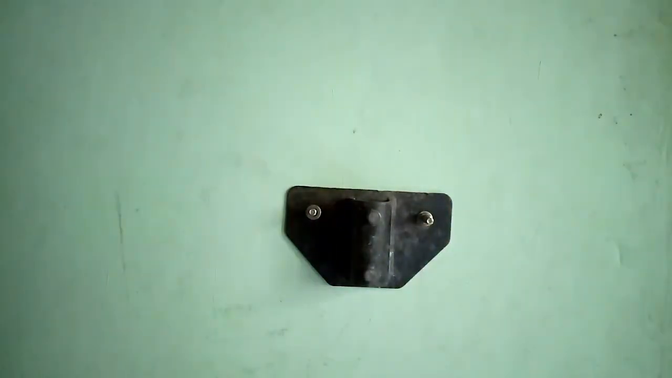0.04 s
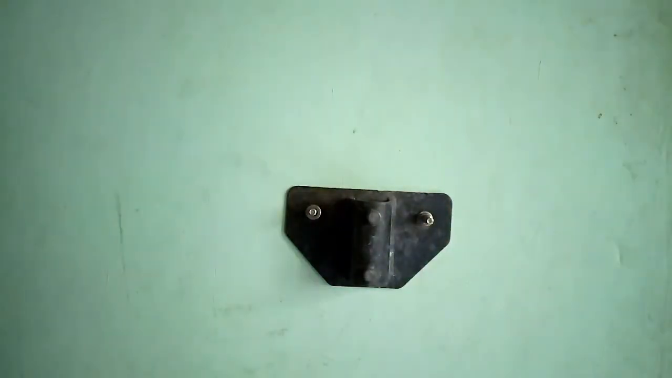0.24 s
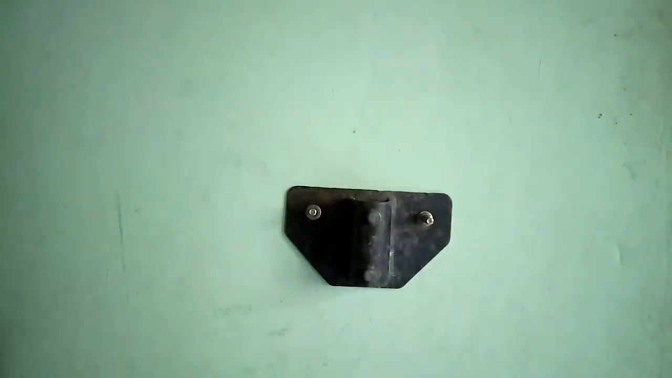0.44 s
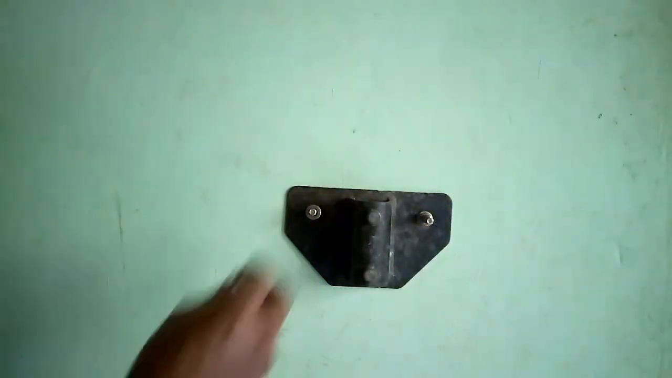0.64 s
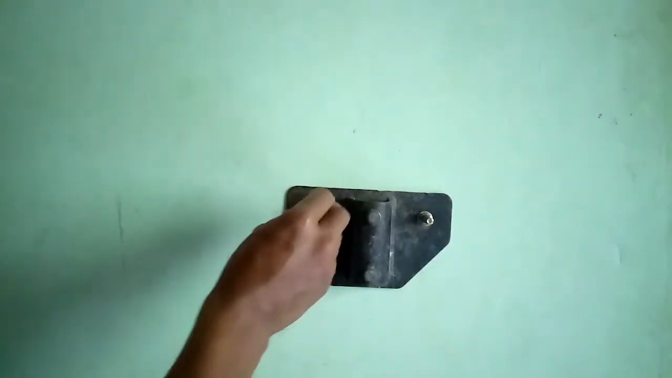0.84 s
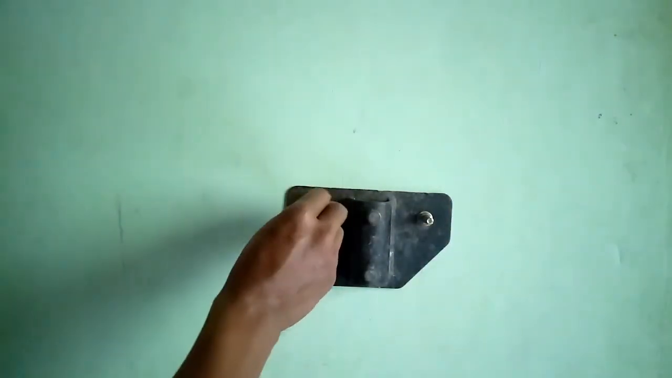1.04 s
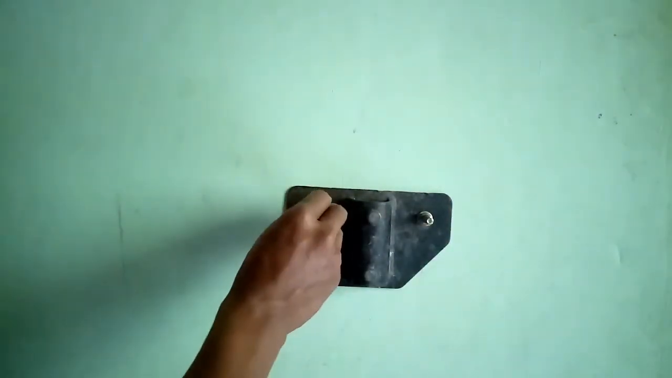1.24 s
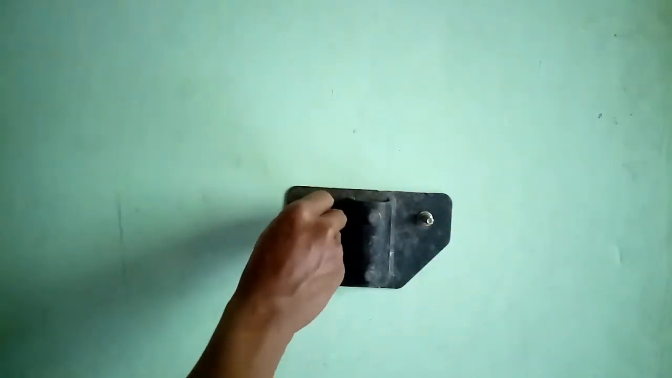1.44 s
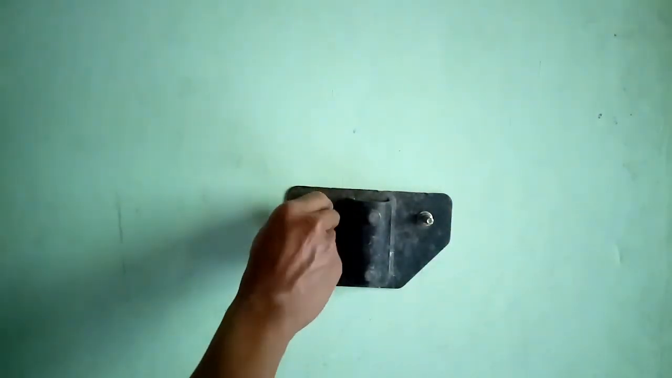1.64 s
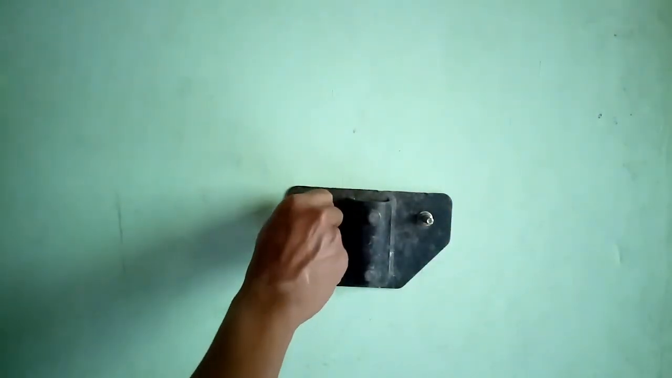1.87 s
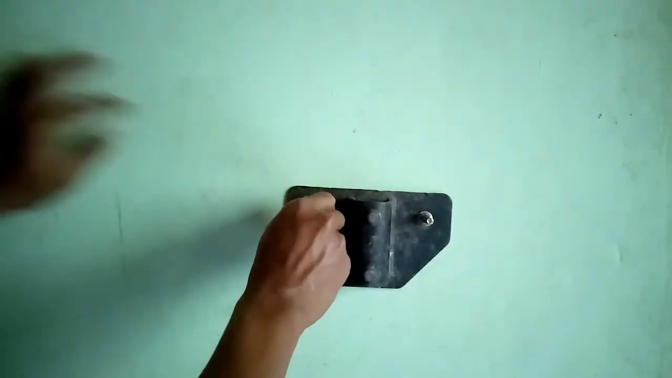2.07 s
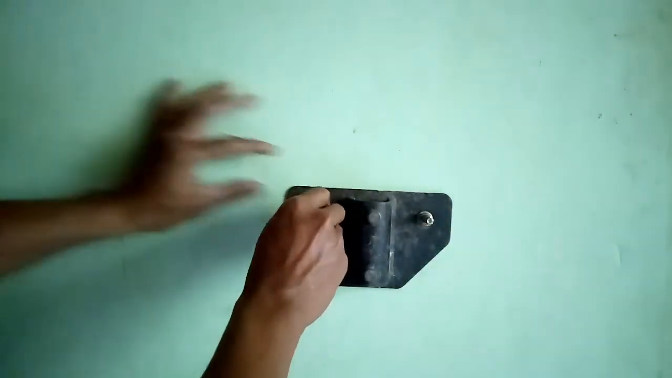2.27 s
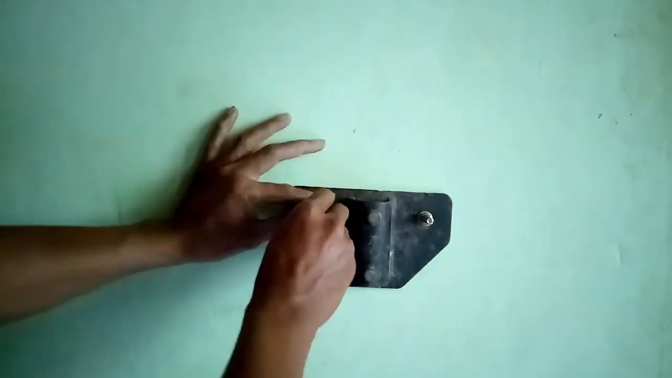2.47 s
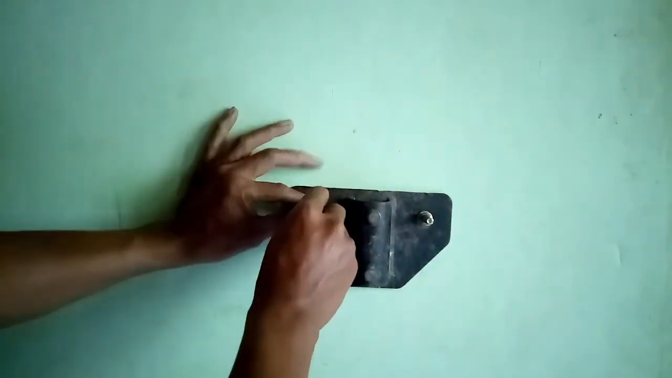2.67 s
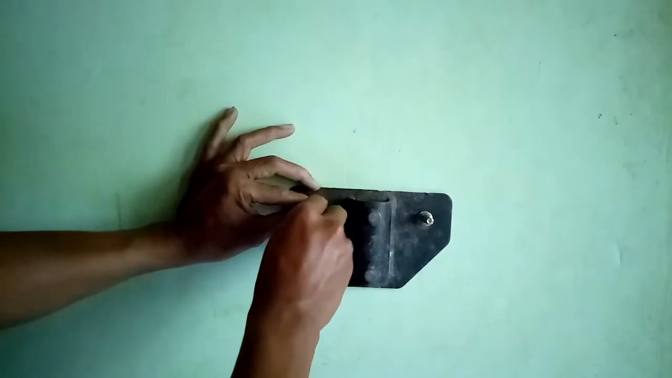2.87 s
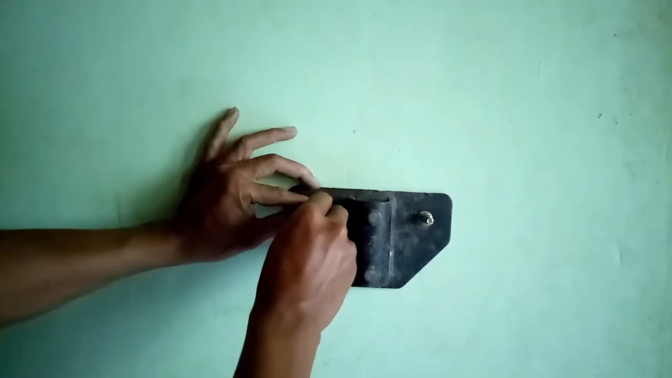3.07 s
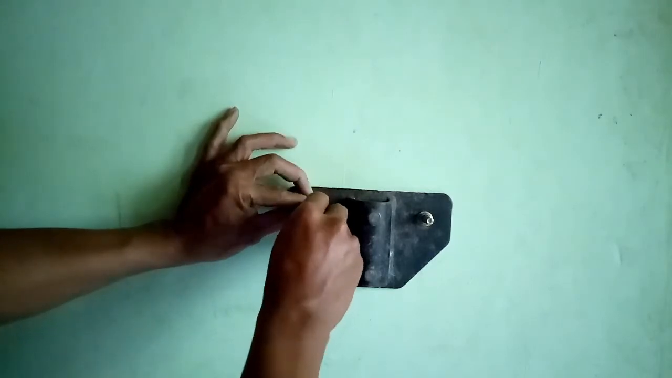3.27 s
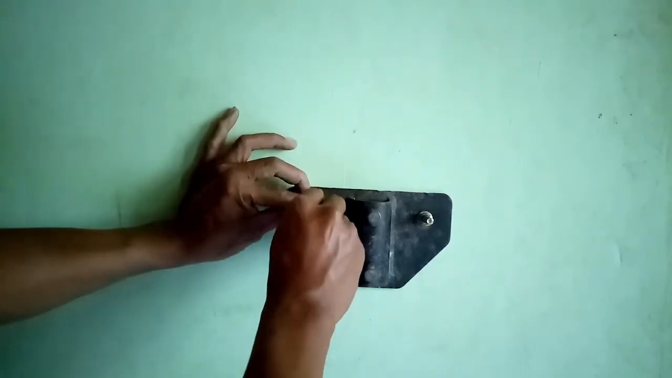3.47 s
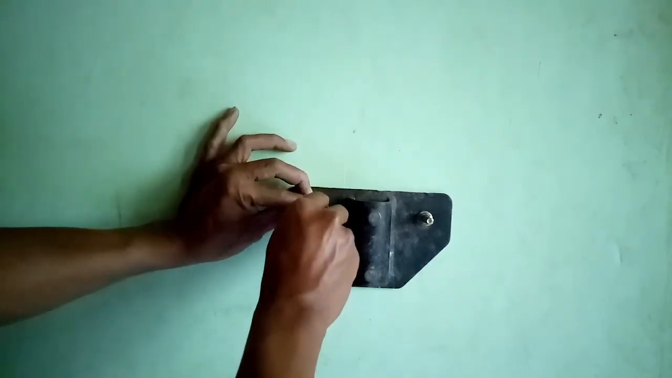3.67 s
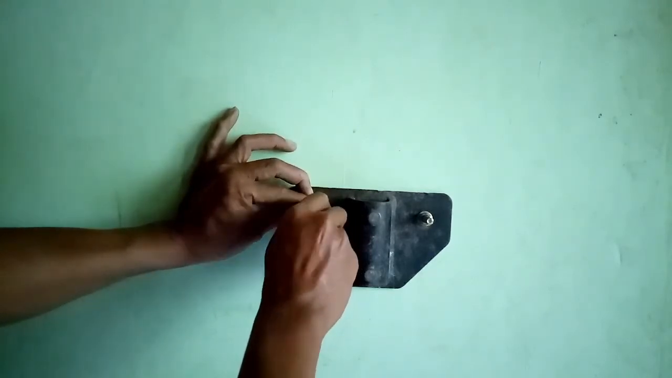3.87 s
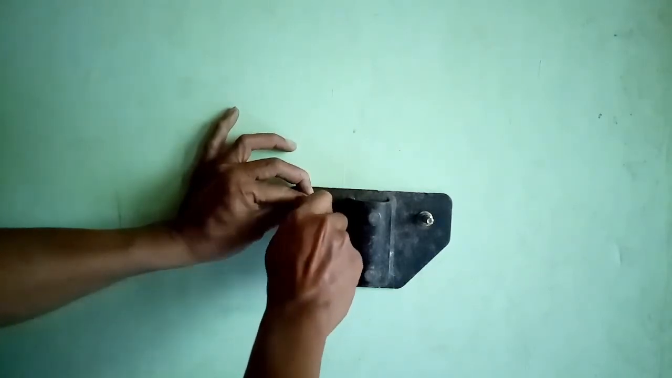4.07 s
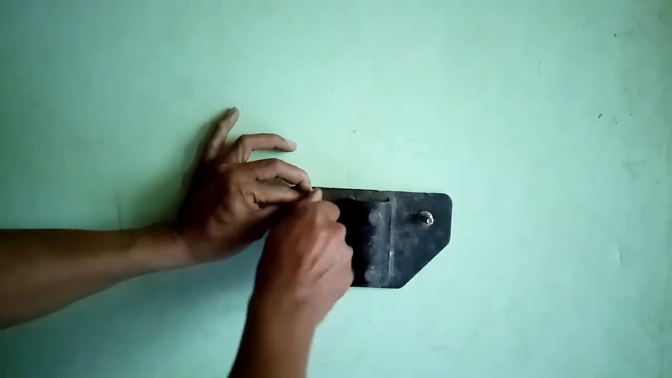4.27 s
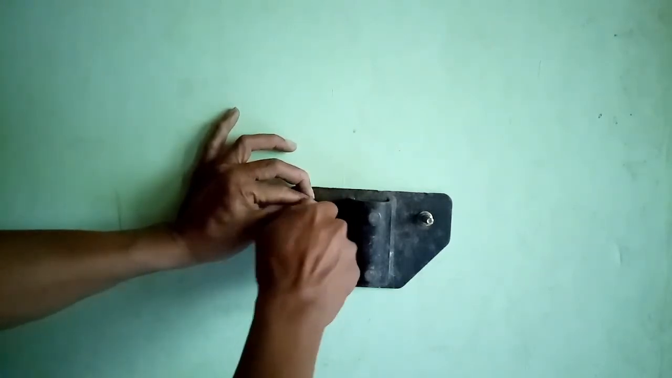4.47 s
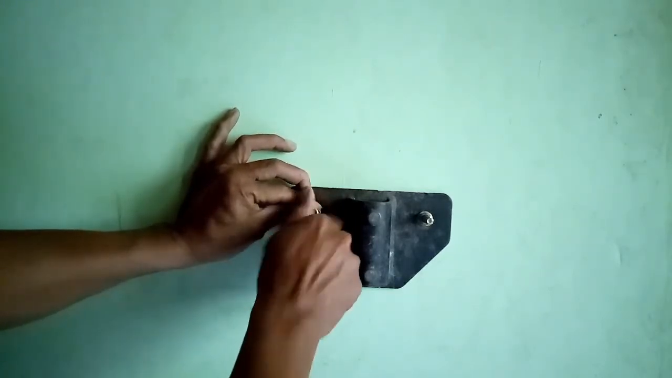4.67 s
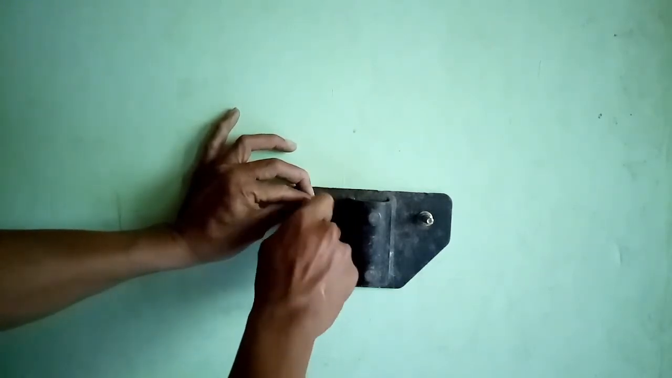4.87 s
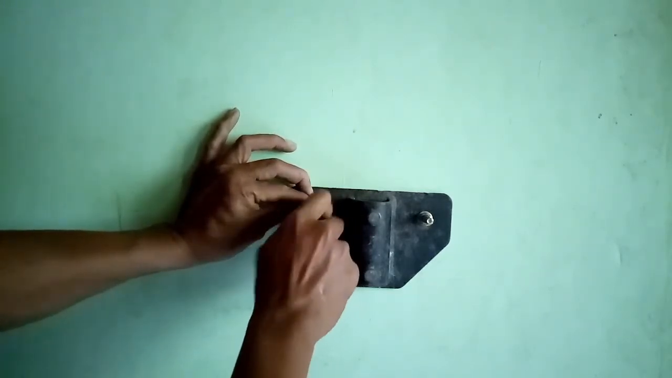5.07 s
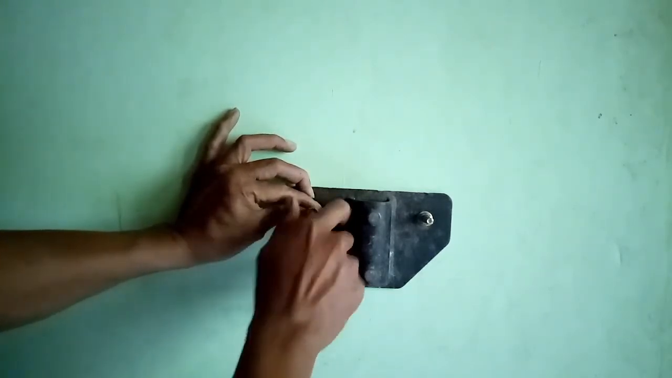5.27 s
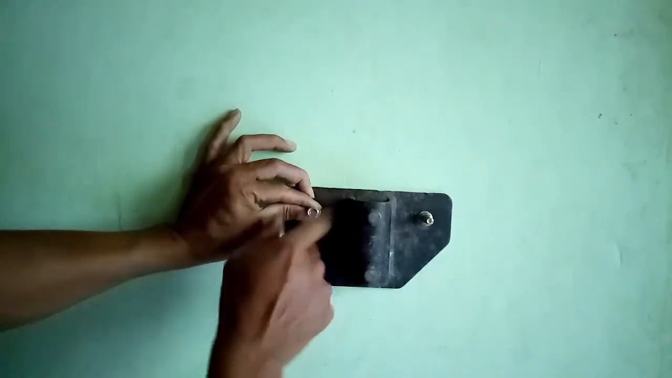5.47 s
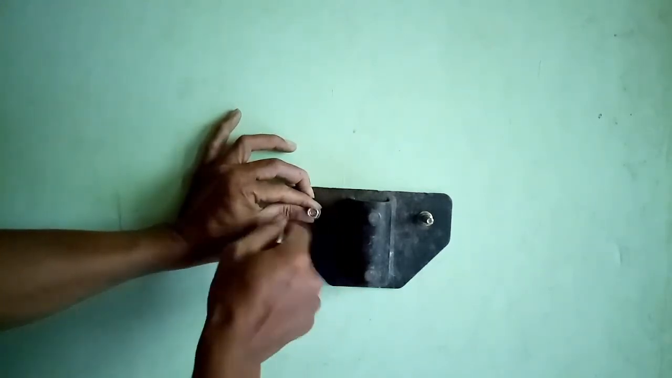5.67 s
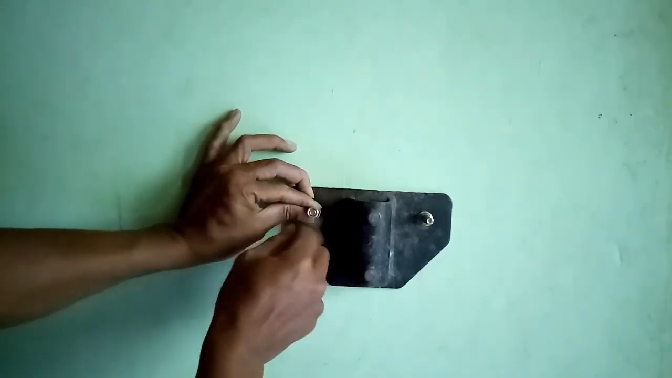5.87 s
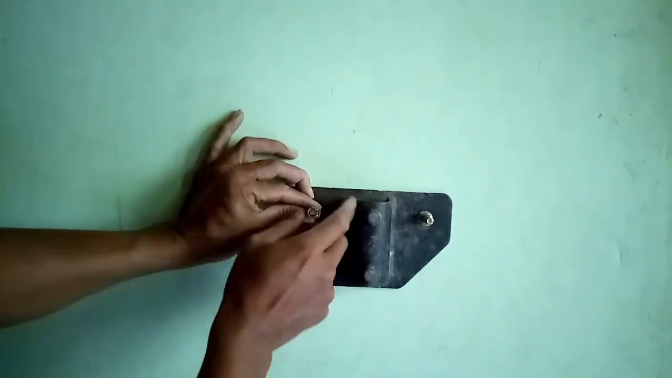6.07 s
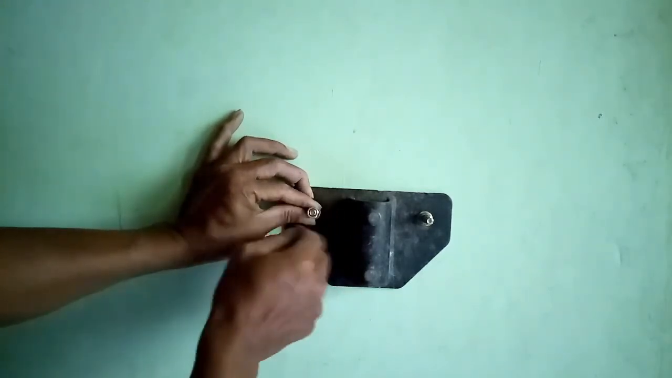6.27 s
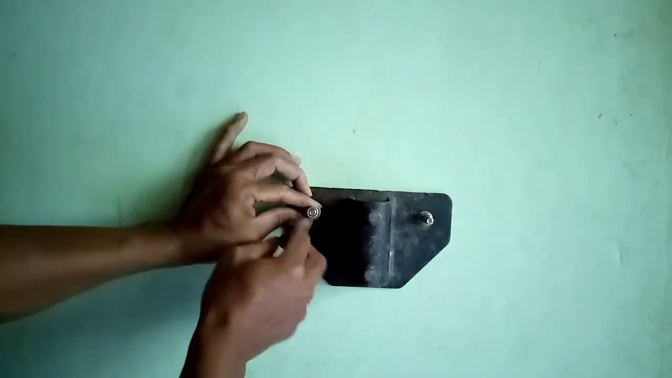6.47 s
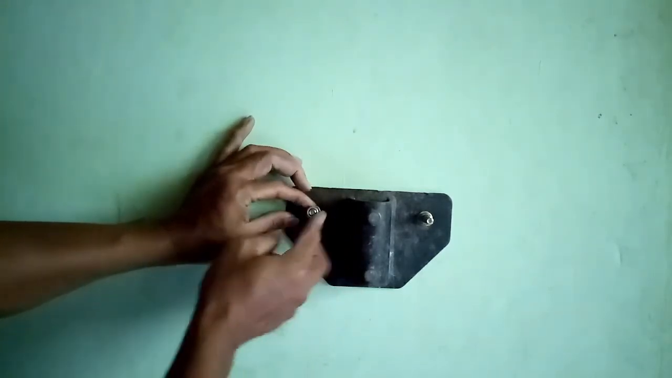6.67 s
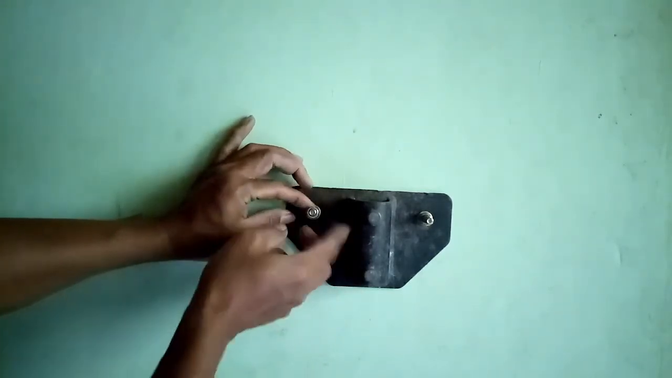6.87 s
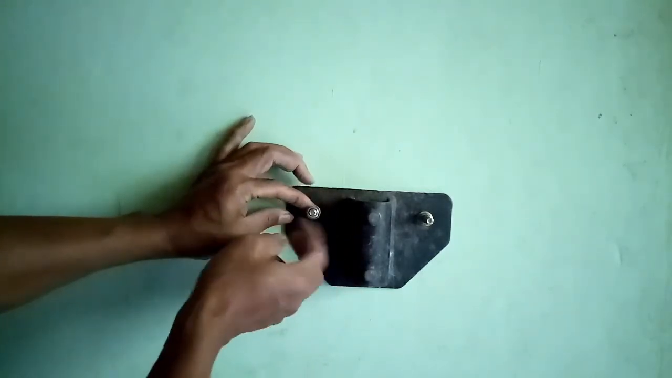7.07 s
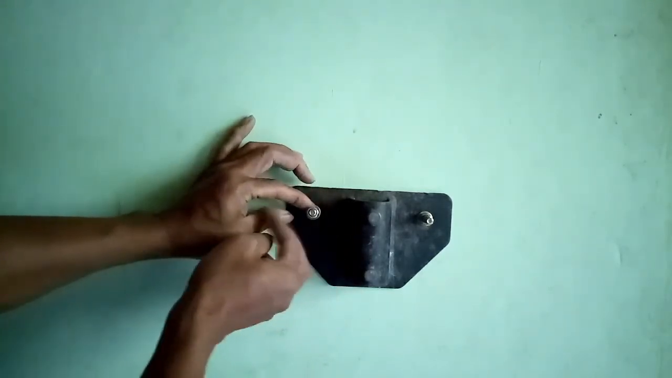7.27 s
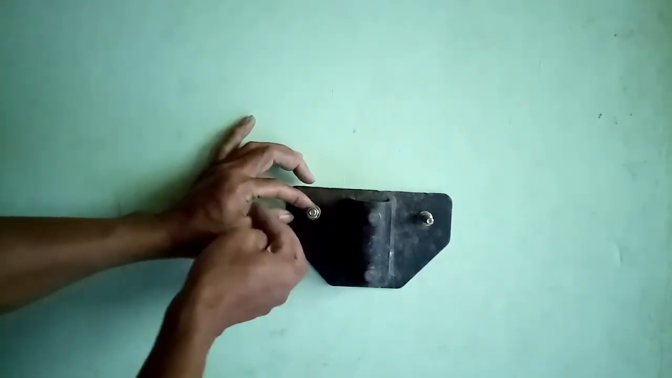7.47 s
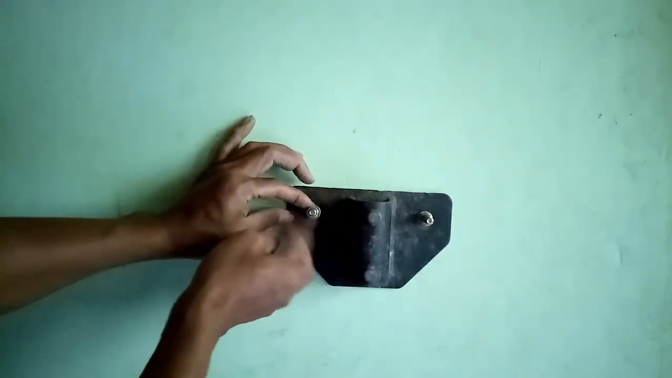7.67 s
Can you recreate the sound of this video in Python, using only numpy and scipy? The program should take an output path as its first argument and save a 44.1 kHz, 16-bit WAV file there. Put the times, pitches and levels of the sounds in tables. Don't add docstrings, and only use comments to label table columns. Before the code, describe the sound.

A very quiet bare room with low, soft hiss. Barely audible skin rubbing and a faint tick come first; at 1.1 s a small bright metal click, then tiny rattles around 1.5 s. From 2.0 to 2.3 s there are light scrapes and a faint thread squeak, and at 2.6 s a quick cluster of ticks. At 3.1 s the stuck nut gives a hard, bright crack, the loudest event, with a short room tail. A softer click at 3.4 s is followed by a faint low boom of air near 3.75 s, then sparse ticks from 4.1 to 4.8 s. From 5.05 s the nut loosens and clicks in quick succession. Strong clacks land at about 5.47, 6.0, 7.1, 7.3 and 7.5 s, with brief scraping run-ups, among lighter irregular rattles continuing to the end. Close phone-like pickup, little bass, clipped echo tails.

```python
import sys
import numpy as np
from scipy import signal
from scipy.fft import rfft, irfft
from scipy.io import wavfile
from scipy.ndimage import uniform_filter1d

SR = 44100
rng = np.random.default_rng(int(sys.argv[2]) if len(sys.argv) > 2 else 0)


def natural_amplitude(level_db):
    exponent = np.asarray(level_db, float) / 20
    return 10 ** exponent


def inscribe(sig):
    pcm = np.round(np.clip(np.atleast_2d(sig).T, -1, 1) * 32767)
    wavfile.write(sys.argv[1], SR, pcm.astype(np.int16))


N = 340893
GATE_DB = 3.5


def evened(x):
    return x / np.sqrt(np.mean(x ** 2) + 1e-20)


def read(points, hz):
    f, value = np.transpose(points)
    return np.interp(np.log(hz + 1), np.log(f + 1), value)


def add(mix, s, sound):
    part = mix[round(s * SR):][:len(sound)]
    part += sound[:len(part)]


def coloured(x, db):
    log = np.log(natural_amplitude(np.maximum(db, db.max() - 95.0)))
    mirrored = np.r_[log, log[-2:0:-1]]
    phase = -signal.hilbert(mirrored).imag[:len(log)]
    response = irfft(np.exp(log + 1j * phase))
    return signal.oaconvolve(x, response)[:len(x)]


def resonate(x, hz, width):
    turn = np.exp(2j * np.pi * np.cumsum(hz * np.ones(len(x))) / SR)
    r = np.exp(-np.pi * width / SR)
    return 2 * (turn * signal.lfilter([1 - r], [1, -r], x / turn)).real


def fuzzy(width):
    return lambda hz: resonate(resonate(rng.standard_normal(len(hz)), hz, width), hz, width)


def stroke(rows, source):
    s, level_db, hz = np.transpose(rows)
    t = np.arange(s[0], s[-1], 1 / SR)
    sound = evened(source(np.interp(t, s, hz)))
    return s[0], natural_amplitude(np.interp(t, s, level_db)) * sound * signal.windows.tukey(len(t), .1)


def swells(rows, source, ends_db, curve):
    mix, u = np.zeros(N), np.linspace(-1, 1, num=21)
    for s, db, hz, rise_s, fall_s in rows:
        times = s + u * np.where(u < 0, rise_s, fall_s)
        levels = db + ends_db * abs(u) ** curve
        add(mix, *stroke(np.transpose([times, levels, hz + 0 * u]), source))
    return mix


def impact_train(own, t, strength):
    impacts = own.standard_normal(len(t)) * (own.random(len(t)) < .15) * strength
    impacts[1500] += .7
    snap = own.standard_normal(len(t)) * natural_amplitude(-60 * np.arange(len(t)) / SR / .007)
    z = rfft(impacts) * rfft(snap)
    z = z / np.sqrt(abs(uniform_filter1d(abs(z) ** 2, size=35)) + 1e-9)
    z = z / abs(z) ** 0.4
    return irfft(z) * uniform_filter1d(strength + .002, size=60) ** 0.22


# frequency in Hz, bandwidth in Hz, level in dB.
FIRST = [(3500, 43, 0), (3740, 120, -8), (4270, 56, -16), (4840, 33, -12), (5250, 34, -5), (5430, 20, -19),
         (6320, 34, -29), (6810, 58, -19), (7390, 76, -40), (8670, 57, -29), (10700, 39, -36)]
# frequency in Hz, bandwidth in Hz, level in dB.
BINDING = [(3510, 47, -10), (4170, 36, -1), (4340, 44, 0), (4950, 26, -7), (5100, 35, -3), (6080, 60, -6),
           (6390, 100, -7), (6790, 46, -7), (10200, 38, -11), (11100, 44, -20), (11400, 53, -21),
           (11700, 53, -20)]
# frequency in Hz, bandwidth in Hz, level in dB.
PLATE = [(2120, 38, -11), (2400, 57, -12), (4510, 79, 0), (4760, 89, 0), (5220, 59, -5), (5910, 48, -3),
         (6390, 56, -2), (6820, 97, -2), (7900, 44, -17), (8120, 31, -16), (8590, 33, -8), (9440, 31, -10),
         (9790, 47, -21), (11100, 39, -3)]
# frequency in Hz, bandwidth in Hz, level in dB.
CRACKED = [(2130, 28, -14), (3010, 26, -14), (4540, 30, -1), (5230, 42, 0), (6010, 72, -6), (6400, 39, -5),
           (6720, 170, -6), (7930, 61, -13), (8580, 64, -12), (9460, 42, -8), (9800, 27, -5),
           (10100, 34, -10), (11100, 29, -10), (11900, 36, -20)]
# frequency in Hz, bandwidth in Hz, level in dB.
PRESSED = [(2770, 37, -2), (3480, 38, 0), (3720, 55, 0), (3910, 56, -2), (4840, 130, -8), (5370, 33, -6),
           (5560, 52, -8), (5790, 34, -4), (7930, 38, -9), (8600, 31, -7), (9460, 48, -11), (9790, 26, -8),
           (11200, 80, -20), (12400, 36, -21)]
# frequency in Hz, bandwidth in Hz, level in dB.
EASED = [(2650, 49, -7), (3340, 37, -12), (4150, 110, -5), (4710, 150, -2), (5210, 54, -4), (6080, 76, 0),
         (6400, 51, -2), (6830, 61, -2), (7030, 91, -7), (9470, 42, -17), (9800, 42, -3), (10100, 27, -11),
         (11000, 35, -11), (11100, 33, -9)]
# frequency in Hz, bandwidth in Hz, level in dB.
SLACK = [(1640, 82, -13), (2490, 52, -6), (2650, 37, -5), (3120, 69, -4), (3470, 46, -8), (4150, 63, 0),
         (4770, 150, -10), (5230, 190, -8), (5840, 36, -11), (6060, 100, -10), (6380, 57, -12),
         (6800, 84, -10), (9800, 33, -18), (11100, 31, -24)]
# frequency in Hz, bandwidth in Hz, level in dB.
LOOSE = [(1690, 38, -11), (2130, 37, -5), (3110, 42, 0), (3290, 43, -6), (3490, 46, -6), (4140, 49, -1),
         (4570, 74, -4), (5160, 84, -2), (5410, 43, -7), (6060, 75, -6), (6840, 60, -4), (8620, 42, -20),
         (9790, 53, -16), (11100, 58, -12)]
# frequency in Hz, bandwidth in Hz, level in dB.
HELD = [(2130, 32, -7), (3320, 48, -2), (3490, 110, 0), (3860, 29, -3), (4130, 63, -3), (4540, 38, -3),
        (5170, 30, -5), (6100, 61, -4), (6740, 73, -10), (7930, 46, -23), (8590, 35, -19), (9460, 31, -17),
        (9790, 31, -14), (11300, 24, -19)]
# frequency in Hz, bandwidth in Hz, level in dB.
FLYING = [(2150, 34, -10), (2360, 30, -8), (2640, 40, -2), (2990, 32, -6), (3490, 210, -5), (3880, 170, -7),
          (4310, 47, -7), (4640, 160, -4), (5210, 180, -7), (5530, 54, -8), (5780, 30, -3), (6080, 56, 0),
          (6820, 150, -8), (11400, 140, -10)]
# frequency in Hz, level in dB per Hz.
FIRST_GRIP = [(2890, -29.5), (3060, -8), (3610, 3.5), (4390, -23), (5200, -21), (7020, -26), (7820, -45),
              (9140, -37)]
# frequency in Hz, level in dB per Hz.
STUCK = [(1500, -32.5), (2570, -30.5), (4020, -2.5), (4660, 2.5), (5500, -11.5), (6620, 4), (7750, -22),
         (11400, -4.5)]
# frequency in Hz, level in dB per Hz.
BREAKS_FREE = [(1880, -29.5), (2800, -23.5), (3010, 1), (3320, -14), (4670, 3.5), (6940, 2.5), (7480, -14),
               (10100, -8)]
# frequency in Hz, level in dB per Hz.
REGRIP = [(1500, -38), (2200, -27), (2550, 2), (3500, 0.5), (6800, -8.5), (7400, -32), (10000, -23.5),
          (12400, -6)]
# frequency in Hz, level in dB per Hz.
CREEPS = [(1500, -30), (2370, -26), (2620, -0.5), (6250, -6.5), (8050, 7.5), (8970, -27.5), (10100, 0),
          (12000, -7)]
# frequency in Hz, level in dB per Hz.
SLACKENS = [(1450, -30), (1700, -20), (2200, -12.5), (3000, 0), (6900, 1.5), (7500, -38), (10000, -33),
            (12000, -38)]
# frequency in Hz, level in dB per Hz.
LIFTS_OFF = [(1450, -18.5), (1700, -9), (2200, -2.5), (3000, 5.5), (6900, 4), (7500, -21), (10000, -27),
             (12000, -27)]
# frequency in Hz, level in dB per Hz.
SPINS = [(1140, -25.5), (1670, -22), (1860, -15), (2150, -4), (4080, 1.5), (6700, 0), (8050, -22),
         (11400, -11)]
# frequency in Hz, level in dB per Hz.
STEADIED = [(1880, -28.5), (2070, -9), (2480, -16), (3610, -1), (6040, 5), (8980, -32), (9470, -19.5),
            (11700, -14)]
# frequency in Hz, level in dB per Hz.
FLICKED = [(1200, -21.5), (1710, -8.5), (2570, 2), (3420, 5), (5500, -2.5), (5980, 3.5), (9290, -17.5),
           (11600, 2.5)]
# start in seconds, modes, crack spectrum, ring level in dB, longest t60 in seconds.
GRIPS = [(0, FIRST, FIRST_GRIP, -23, 0.06), (1.4, BINDING, STUCK, -15, 0.078),
         (1.9, PLATE, STUCK, -15.5, 0.034), (3.0, CRACKED, BREAKS_FREE, -18, 0.14),
         (3.3, PRESSED, REGRIP, -17.5, 0.054), (4.0, EASED, CREEPS, -10, 0.034),
         (4.6, SLACK, SLACKENS, -10, 0.07), (5.0, SLACK, LIFTS_OFF, -6.5, 0.06),
         (5.43, LOOSE, SPINS, -22, 0.045), (6.45, HELD, STEADIED, -20.5, 0.047),
         (6.7, FLYING, FLICKED, -25.5, 0.047)]
# frequency in Hz, level in dB.
CRACK_ENDS = [(600, -24.5), (1300, -6.5), (12000, 1.5), (15500, -39)]


def knock(row, chatter_s, lead_s, seed):
    s, peak_db, ring_hz, weight_db, high_db = row
    _, modes, crack, ring_db, longest_s = [grip for grip in GRIPS if grip[0] <= s][-1]
    own = np.random.default_rng(seed)
    t = np.arange(-1500, 1500) / SR
    strength = np.where(t < 0, np.exp(t / lead_s), np.exp(-t / chatter_s))
    strength += natural_amplitude(-30) * (t > -.007) * (t < 0)
    drive = impact_train(own, t, strength)

    age = np.arange(8000) / SR
    body = 7.9 * (age == 0)
    touch_db = 1.8 * own.standard_normal(30)
    splits = own.uniform(-.02, .02, 30)
    for (f, width, db), luck_db, split in zip(modes, touch_db, splits):
        level_db = db - read(crack, f) + luck_db + ring_db
        t60_s = np.clip(3.0 / width, .015, longest_s)
        pair = np.sin(2 * np.pi * f * age) + 0.45 * np.sin(2 * np.pi * f * (1 + split) * age)
        body += natural_amplitude(level_db - 60 * age / t60_s) * pair
    body += natural_amplitude(-27.0 - 60 * age / 0.078) * np.sin(2 * np.pi * ring_hz * age)

    hz = np.fft.rfftfreq(1024, 1 / SR)
    low_slope_db = -2
    tilt = [(2300, weight_db - low_slope_db), (3200, weight_db + low_slope_db),
            (4500, 0), (6900, 0), (7800, high_db)]
    colour_db = read(crack, hz) + read(CRACK_ENDS, hz) + read(tilt, hz)
    colour_db -= 6.0 * np.minimum(abs(np.log2((hz + 1) / ring_hz)), .8)
    colour_db += 1.0 * evened(uniform_filter1d(own.standard_normal(len(hz)), size=9))
    sound = coloured(signal.fftconvolve(drive, body), colour_db)
    return s + t[0], natural_amplitude(peak_db) * sound / abs(sound).max()


# start in seconds, peak in dB, strongest ring in Hz, brightness above
# 8 kHz in dB, run-up in seconds.
SLAMS = [
    (5.4429, -31.5, 4060, 0.5, 0.0025),
    (5.4735, -19.5, 3330, 1, 0.017),
    (5.99, -19, 3010, 3, 0.025),
    (6.273, -29, 3330, -1, 0.0035),
    (6.747, -42, 6250, 1.5, 0),
    (6.8068, -26, 3720, -4, 0.026),
    (7.085, -19.5, 6430, -5.5, .018),
    (7.2917, -20, 5930, -7, 0.015),
    (7.5254, -19.5, 5880, -6.5, 0.028),
]


def slam_rows():
    weight_db, run_up_db, dull_db = 2, -11.5, -7
    slams, run_ups = [], []
    for s, db, hz, high_db, lead_s in SLAMS:
        slams.append((s, db, hz, weight_db, high_db))
        if lead_s > .004:
            run_ups.append((s - lead_s, db + run_up_db, hz, weight_db, high_db + dull_db))
    return slams, run_ups


# start in seconds, peak in dB, strongest ring in Hz, weight under
# 3 kHz in dB, brightness above 8 kHz in dB.
TICKS = [(0.3864, -68, 6000, 6, -18), (1.113, -61, 3740, -8, -5), (1.4335, -59, 6860, -5, -1),
         (3.374, -48, 3450, -7, -10), (1.1245, -27.5, 3690, -11.5, -1), (1.1384, -55, 3500, 14, -5),
         (1.1671, -52, 3750, -5, 8), (1.2074, -41.5, 3500, 10, 6), (1.2198, -45.5, 4000, -20, -12),
         (2.0338, -44, 4500, 7, -3.5), (2.2271, -48, 6800, -7.5, 6), (2.596, -38.5, 4920, -5, -5.5),
         (2.6031, -36.5, 6050, 6, 4), (2.6165, -35, 4850, -9, -1), (2.7314, -50, 4500, 13, -9),
         (2.9298, -54, 6170, -11, 0), (3.08, -33.5, 4730, -3, -6), (3.0896, -23.5, 7150, 2, -3),
         (3.0946, -14.5, 5120, 0, 2), (3.3831, -27, 3540, -5, 1.5), (4.1351, -51, 3480, 16.5, 11),
         (4.3077, -32, 4640, -6, 0.5), (4.5287, -35.5, 6300, -7.5, -12.5), (4.6414, -48.5, 4020, -11.5, -6),
         (4.7201, -45.5, 3930, -5, -7), (4.7464, -48, 3930, -13.5, -5)]
# start in seconds, peak in dB, strongest ring in Hz, weight under
# 3 kHz in dB, brightness above 8 kHz in dB.
FREE_TICKS = [(5.0545, -35, 4170, -5.5, -1.5), (5.0957, -32.5, 4260, 5, 4), (5.1502, -31, 4660, 3, 2),
              (5.2816, -42.5, 4340, -11.5, -19), (5.414, -40.5, 4240, -13, -3),
              (5.5691, -24, 3160, -2, 2.5), (5.6748, -24.5, 2770, 2, 4), (5.7389, -36.5, 4100, -7, -4),
              (5.9237, -41.5, 3230, 1, -21), (6.17, -46.5, 5900, -22, -7),
              (6.2275, -28.5, 3870, -3.5, -0.5), (6.2325, -44, 6200, -8, -5), (6.5002, -24, 4110, 6, 5.5),
              (6.5145, -35.5, 3380, 23, -5), (6.298, -48, 3140, 5, -8), (6.7437, -33.5, 5560, -18, -17),
              (6.9939, -51, 4640, -18, -6), (7.012, -28, 5500, -6, -8), (7.2514, -31, 6400, 3, -7),
              (7.4059, -24, 3980, -2, -4), (7.4851, -26.5, 2580, -10, -9), (7.7214, -25.5, 3480, -8, -3)]
# start in seconds, peak in dB, strongest ring in Hz, weight under
# 3 kHz in dB, brightness above 8 kHz in dB.
RATTLES = [(0.842, -65.5, 6060, -2, -12), (1.4446, -44.5, 6800, -9, 0.5), (1.4567, -47, 4180, -11, -26),
           (1.4763, -43, 4060, 9, -7), (1.514, -44, 6250, 0.5, -5), (1.9783, -57, 5300, -29, -13),
           (2.4254, -68, 5800, -1, 10), (5.068, -43, 3110, 4.5, -18), (5.11, -41, 3120, 4, -7),
           (4.32, -48, 5200, -6, 2), (5.168, -35.5, 2670, 0, -1), (5.19, -42.5, 3070, 1, -12),
           (3.395, -39, 3440, 6, -12)]


def nut_on_thread():
    mix = np.zeros(N)
    slams, run_ups = slam_rows()
    # rows, chatter after the contact (s), build-up before it (s)
    kinds = ((TICKS, .0022, .0004), (FREE_TICKS, .003, .0009),
             (RATTLES + slams, .006, .007), (run_ups, .022, .0018))
    for rows, chatter_s, lead_s in kinds:
        for row in rows:
            add(mix, *knock(row, chatter_s, lead_s, int(rng.integers(1 << 30))))
    return mix


# frequency in Hz, t60 in seconds.
ROOM = [(1500, 0.51), (4000, 0.52), (7000, 0.42), (12000, 0.3)]


def room(x):
    out, t = np.zeros(N), np.arange(N) / SR
    for k in range(3):
        hz, age, z = signal.stft(rng.standard_normal(30000), SR, nperseg=128)
        decay = natural_amplitude(-60 * age / read(ROOM, hz)[:, None])
        tail = signal.istft(z * decay, SR, nperseg=128)[1]
        tail *= np.clip(np.arange(len(tail)) / SR / 0.00095 - .4, 0, 1)
        share = np.sqrt(2 / 3) * np.cos(np.pi * (t * 4 + k / 3))
        out += signal.oaconvolve(x * share, tail / np.linalg.norm(tail))[:N]
    return out


# frequency in Hz, level in dB per Hz.
RUB = [(590, -73), (1000, -14.5), (1520, -9), (1800, -15.5), (3070, -13), (3760, -12), (4410, -15.5),
       (6270, 2), (8320, -21.5), (12000, -13.5), (15000, -45)]


def rub(hz):
    n = len(hz)
    grit = rng.standard_normal(n) * natural_amplitude(2.6 * np.minimum(rng.exponential(1, n), 5))
    grit = grit * natural_amplitude(2.5 * evened(uniform_filter1d(rng.standard_normal(n), size=700)))
    wide = evened(coloured(grit, read(RUB, np.fft.rfftfreq(1024, 1 / SR))))
    rings = sum(natural_amplitude(db / 2) * resonate(grit, f, 51.0) for f, _, db in PLATE[2:12])
    return wide + .5 * evened(resonate(wide, hz, 630.0)) + 0.23 * evened(rings)


# loudest moment in seconds, level in dB, centre in Hz, rise in seconds,
# fall in seconds.
RUBS = [(.384, -74, 6180, 0.23, 0.51), (.86, -59, 6440, 0.091, 0.1), (1.5, -61.5, 5060, 0.06, .14),
        (1.728, -81, 4365, 0.16, 0.11), (2.04, -56.5, 5230, 0.099, 0.28), (2.23, -60, 5500, 0.014, 0.067),
        (2.42, -63.5, 5780, 0.46, 0.45), (2.596, -61, 5560, 0.034, 0.3), (2.95, -77, 6250, 0.13, .03),
        (3.45, -66.5, 5170, 0.016, 0.31), (3.85, -80, 5500, 0.47, 0.22), (4.526, -65, 5960, 0.033, 0.35),
        (4.728, -68, 4750, 0.02, 0.068)]


def rubbing():
    return swells(RUBS, rub, -21, 1.1)


# loudest moment in seconds, level in dB, centre in Hz, rise in seconds,
# fall in seconds.
SQUEAKS = [
    (.46, -70, 1767, 0.11, 0.076),
    (2.07, -70.5, 1595, 0.11, 0.041),
    (2.16, -66, 1530, 0.073, 0.053),
]


def squeaks():
    return swells(SQUEAKS, fuzzy(91.0), -9, 1.9)


# start in seconds, end in seconds, frequency in Hz, level in dB.
WHINES = [(.336, .564, 5900, -81), (.494, .64, 9070, -85), (.53, .64, 7470, -80), (.661, .727, 11440, -78),
          (.697, .76, 9600, -84), (.83, .9, 11500, -79), (.8, 1.01, 5780, -76), (1.6, 1.783, 4380, -75),
          (2.03, 2.3, 4500, -68), (2.42, 2.62, 4510, -69), (2.595, 2.666, 2170, -68),
          (4.3, 4.422, 2640, -68), (4.53, 4.65, 3200, -71), (4.665, 4.81, 4143, -68),
          (6.3, 6.49, 2650, -68), (6.33, 6.49, 3120, -68), (5.09, 5.26, 1660, -66), (4.84, 4.97, 4143, -70),
          (3.095, 3.2, 2350, -60), (4.97, 5.05, 5720, -76), (5.13, 5.284, 11120, -77),
          (6.803, 6.976, 11580, -68), (6.168, 6.19, 11100, -72), (4.84, 4.98, 2500, -74),
          (4.63, 4.665, 4140, -62), (2.55, 2.6, 8600, -76)]


def whines():
    mix = np.zeros(N)
    for start, end, hz, db in WHINES:
        add(mix, *stroke([(start, db, hz), (end, db - 5, hz)], fuzzy(110.0)))
    return mix


# loudest moment in seconds, level in dB, centre in Hz, rise in seconds,
# fall in seconds.
CHINK = [
    (5.11, -69.5, 890, 0.071, 0.095),
    (5.65, -76.5, 898, 0.23, 0.26),
]


def freed_plate():
    return swells(CHINK, fuzzy(29.0), -8, 2.5)


# loudest moment in seconds, level in dB, centre in Hz, rise in seconds,
# fall in seconds.
BOOM = [
    (3.76, -51, 258, 0.11, 0.26),
    (3.75, -54, 216, .16, 0.22),
    (4.43, -60, 246, 0.37, 0.123),
    (7.37, -64, 324, 0.11, 0.074),
]


def draught():
    return swells(BOOM, fuzzy(35.6), -30, 1.9)


# frequency in Hz, level in dB per Hz.
AIR = [(15, -27.5), (30, -20.5), (50, -20), (82, 4), (107, 0.5), (253, -0.5), (470, -6.5), (784, -6),
       (973, -9.5), (4050, -14.5), (5160, -20), (6230, -18), (7730, -27), (11600, -28.5), (15600, -29.5)]


def air(level_db=-70, patchy_db=2.0):
    frames, hz = N // 256 + 5, np.fft.rfftfreq(1024, 1 / SR)
    a, b, patches = rng.standard_normal((frames, 513, 3)).T
    patches = evened(uniform_filter1d(uniform_filter1d(patches, 8, 0), 12, 1))
    z = (a + 1j * b) * natural_amplitude(read(AIR, hz)[:, None] + patchy_db * patches)
    hiss = signal.istft(z, nperseg=1024, noverlap=768)[1][:N]
    return natural_amplitude(level_db + GATE_DB) * evened(hiss)


def scene():
    metal = nut_on_thread()
    reverberant = natural_amplitude(-5.0) * room(metal)
    faint = rubbing() + squeaks() + whines() + freed_plate() + draught()
    return (metal + reverberant + faint + air())[None]


def top_cut(x):
    return signal.sosfilt(signal.butter(12, 15720, fs=SR, output="sos"), x)


def record(dry):
    hz, t, z = signal.stft(dry[0], SR, nperseg=512, noverlap=384)
    power = uniform_filter1d(abs(z) ** 2, size=9, axis=1)
    power = uniform_filter1d(power, size=5, axis=0) + 1e-20
    hiss = np.percentile(power, 20, axis=1)[:, None]
    kept = np.maximum(1 - 2.1 * hiss / power, 0) ** .5
    z = z * np.maximum(kept, natural_amplitude(-GATE_DB))
    gated = signal.istft(z, SR, nperseg=512, noverlap=384)[1][None, :N]
    edge = signal.firwin(511, 15700, window=("kaiser", 9), fs=SR)
    mix = signal.oaconvolve(gated, edge[None], "same")
    return top_cut(mix)


dry = scene()
out = record(dry)
inscribe(out)
```